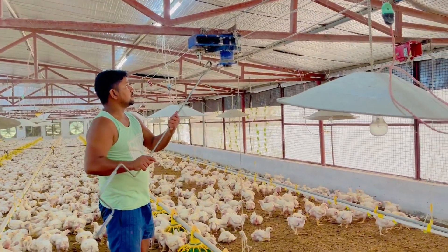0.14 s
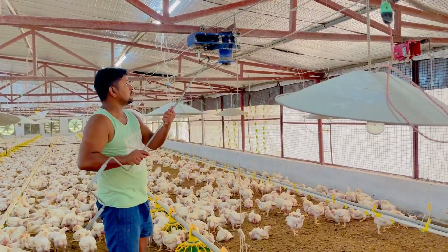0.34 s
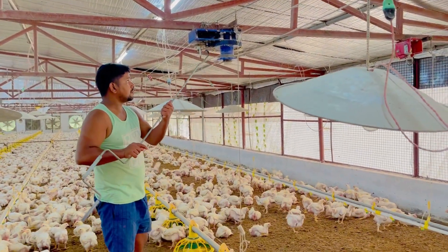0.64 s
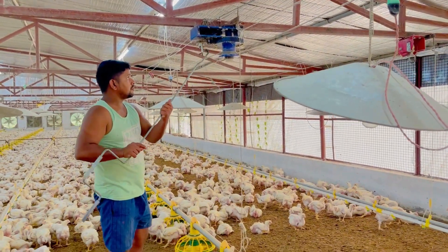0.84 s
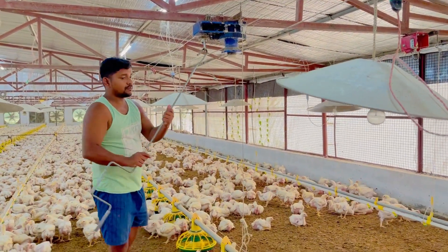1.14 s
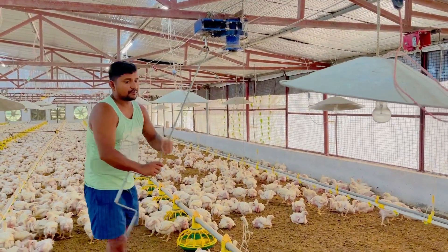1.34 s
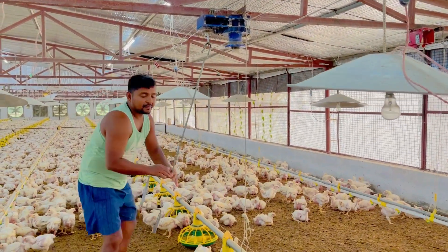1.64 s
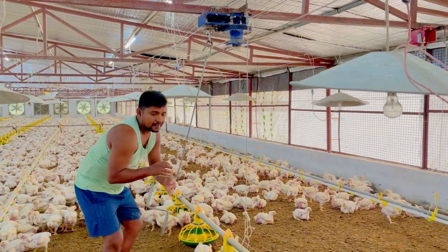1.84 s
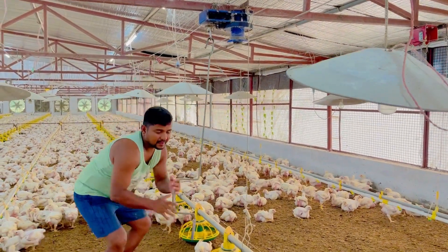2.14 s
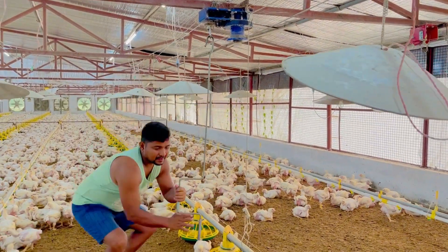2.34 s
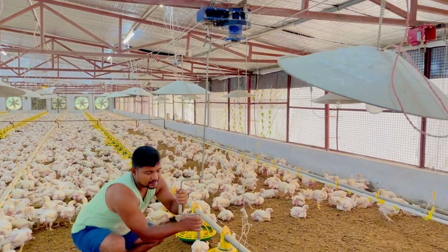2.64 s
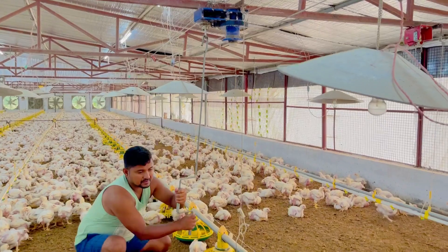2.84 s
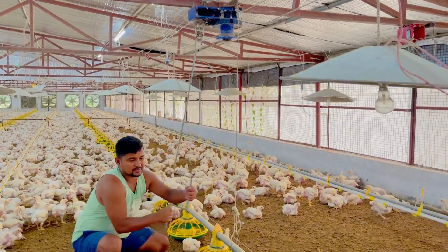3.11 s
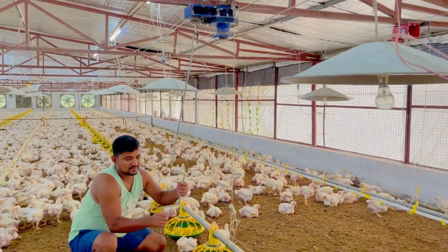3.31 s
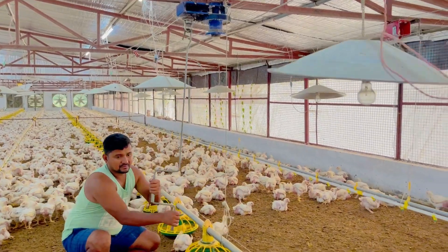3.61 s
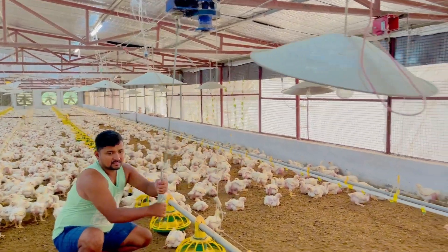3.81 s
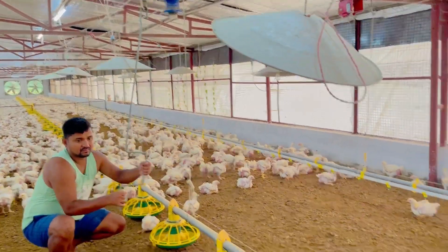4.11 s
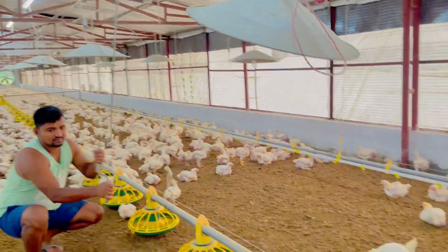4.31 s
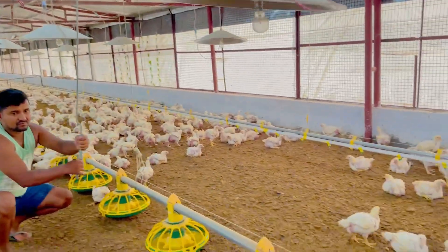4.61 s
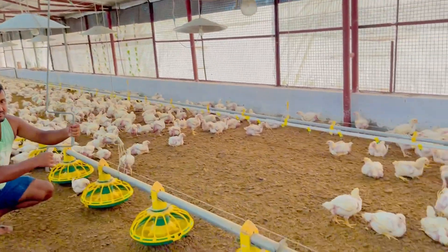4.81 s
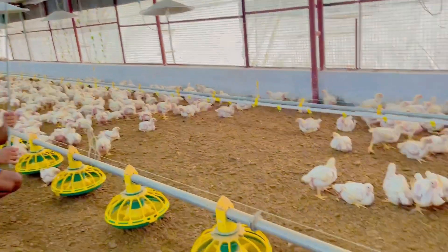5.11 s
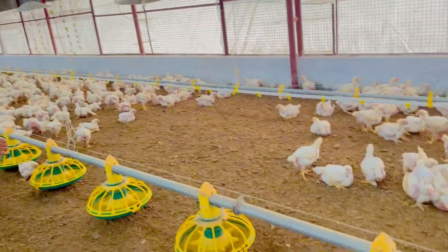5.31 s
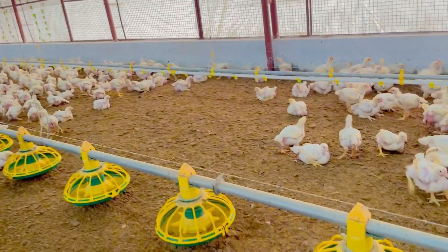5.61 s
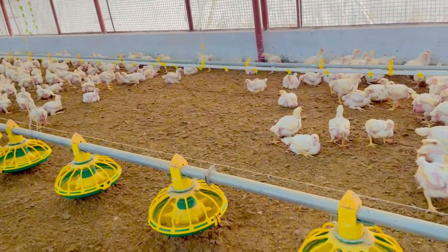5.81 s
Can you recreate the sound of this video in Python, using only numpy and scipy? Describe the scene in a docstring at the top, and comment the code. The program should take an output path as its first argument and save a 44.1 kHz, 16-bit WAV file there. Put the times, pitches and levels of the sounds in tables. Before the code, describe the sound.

In a long, airy poultry shed, fans drone and throb beneath soft bird chatter, with a few nearer peeps standing out. Faint ticks and one clearer metallic tick near one second precede a thin axle squeak at about three. Sharp, bright winch clacks then repeat in a slightly uneven rhythm, with extra gear ticks between them, while the flock grows louder. A single handheld-style mono perspective, winch close, with a light scattered echo.

```python
"""In a long poultry shed a hand winch is turned nearby: it squeaks as it takes the load, then its pawl clacks.
The clacks, gear ticks and frame knocks are struck modes with shaped noise; the squeaks are stick-slip partials.
A flock of young broilers peeps and chatters in gliding tones over shaped noise. Exhaust fans throb as
beating harmonics, with a roar of filtered noise and low gusts. Sparse, decaying echoes throw
the winch and the birds back from the shed."""
import sys
import numpy as np
from scipy import signal
from scipy.fft import rfft, irfft
from scipy.io import wavfile
from scipy.ndimage import uniform_filter1d

SR = 44100
rng = np.random.default_rng(int(sys.argv[2]) if len(sys.argv) > 2 else 0)


def unload_wav(signal):
    """Save mono or channel-first audio to the path in sys.argv[1] as 16-bit WAV at rate SR, clipped to [-1, 1]."""
    wavfile.write(
        sys.argv[1],
        SR,
        np.round(np.clip(np.atleast_2d(signal).T, -1, 1) * 32767).astype(np.int16),
    )


N = 262395

# modes of the winch frame: mode_hz, relative_level_db
FRAME_MODES = [(910, -6.5), (1310, 2.5), (2130, -3.5), (2330, -3), (3200, -1.5), (3570, -3.5), (4330, -5),
               (5135, 2), (5600, -1), (6150, 1), (7200, -4), (7800, -15), (8590, 2), (9680, -1),
               (10750, 2.5)]
# voice spectrum of the flock, also used as the noise colour of frame knocks: frequency_hz, relative_level_db
THROAT_SPECTRUM = [(500, -33.5), (900, -14.5), (1200, -8), (1600, -6.5), (2100, -2), (2600, -9.5),
                   (3300, -15.5), (4200, -30)]


def gain_of(db):
    """Level law: an amplitude ratio is ten to the power of dB over twenty."""
    return 10 ** (np.asarray(db) / 20)


def evened(x):
    """Equal power: scales a signal to rms 1."""
    return x / np.sqrt(np.mean(x ** 2) + 1e-20)


def read(points, hz):
    """Logarithmic frequency scale: interpolates a table of frequency and value."""
    f, value = np.transpose(points)
    return np.interp(np.log(hz + 1), np.log(f + 1), value)


def add(mix, s, sound):
    """Superposition: adds a sound into the mix from time s on."""
    part = mix[round(s * SR):][:len(sound)]
    part += sound[:len(part)]


def wander(count, width):
    """Slow random fluctuation: noise smoothed twice over width samples, at rms 1."""
    once = uniform_filter1d(rng.standard_normal(count), width)
    return evened(uniform_filter1d(once, width))


def dying(x, t60s):
    """Frequency-dependent decay: each band falls by 60 dB in its own t60."""
    hz, t, bands = signal.stft(x, SR, nperseg=128)
    decay_db = -60 * t / read(t60s, hz)[:, None]
    return signal.istft(bands * gain_of(decay_db), SR, nperseg=128)[1][..., :x.shape[-1]]


def coloured(x, points):
    """Linear filtering: multiplies the spectrum by a table of frequency and dB."""
    count = x.shape[-1]
    response = gain_of(read(points, np.fft.rfftfreq(count, 1 / SR)))
    return irfft(rfft(x) * response, count)


def leading(modes, lead_hz, lead_db):
    """Selective excitation: draws modes near lead_hz towards the level lead_db."""
    width = 0.097  # in natural log of frequency
    hz, db = np.transpose(modes)
    near = np.exp(-(np.log(hz / lead_hz) / width) ** 2)
    return np.c_[hz, db + near * (lead_db - db)]


def rings(modes, t, t60):
    """Modal decay of struck metal: clusters of three close tones beat, and high modes die first."""
    hz, db = np.repeat(modes, 3, axis=0).T[:, :, None]
    level, detune, phase = rng.standard_normal((len(hz), 3)).T[:, :, None]
    mode_t60 = t60 * (1000 / hz) ** .4  # t60 holds at 1 kHz
    db = db + 3.2 * level - 60 * t / mode_t60  # uneven excitation, then decay
    tones = np.sin(2 * np.pi * hz * (1 + 0.0113 * detune) * t + 2 * phase)
    return (gain_of(db) * tones).sum(0)


def clacks(ring_db=-2.5, split_hz=2800, bright_hz=9000, chatter_db=2.0):
    """Impact excitation: each pawl drop cracks, rings the frame with one leading mode and rattles its plates."""
    # pawl drops: start_s, level_db, hardness_db, lead_hz
    pawl_drops = [(3.066, -19, 0, 2330), (3.268, -18, -1, 2330), (3.473, -18, 0.5, 2120),
                  (3.703, -18, 4, 3570), (3.896, -19, 1.5, 2130), (4.129, -18, -2.5, 8590),
                  (4.309, -17, 0, 2130), (4.482, -18.5, 4, 10750), (4.670, -18.5, -0.5, 8590),
                  (4.970, -19, -3, 2380), (5.192, -19.5, 0, 8590), (5.406, -18, 3, 10750),
                  (5.615, -19, 0, 7200), (5.882, -18, -1.5, 8590)]
    # dense ring of the plates: frequency_hz, relative_level_db
    plate_spectrum = [(180, -24), (300, -10), (1030, -5.5), (1340, -1), (1660, -5.5), (2140, 1.5),
                      (2700, -3), (3460, -5), (4670, -7.5), (6500, -5.5), (10600, -1), (15000, -13),
                      (17000, -23)]
    # decay of the plates: frequency_hz, t60_s
    plate_t60 = [(400, 0.6), (1500, 0.26), (4000, 0.29), (10000, 0.15), (15000, 0.079)]
    lead_db, frame_t60 = 7.5, .26  # dB; s at 1 kHz
    crack_db, crack_per_db = -2, 0.54  # a harder blow cracks more
    dull_per_db = -0.67  # and loses low ring

    out, t = np.zeros(N), np.arange(12288) / SR
    hz = np.fft.rfftfreq(len(t), 1 / SR)
    for s, db, hard_db, lead_hz in pawl_drops:
        ring = rings(leading(FRAME_MODES, lead_hz, lead_db), t, frame_t60)
        plates = dying(coloured(rng.standard_normal(len(t)), plate_spectrum), plate_t60)
        chatter = gain_of(chatter_db * wander(len(t), 150))  # loose parts chatter on
        plates = plates / plates[:800].std() * chatter
        blow = gain_of(ring_db) * ring / ring[:800].std() + plates
        # hardness tilts the lows below split_hz against the treble above bright_hz
        low_db = (-2 + dull_per_db * hard_db) / (1 + (hz / split_hz) ** 4)
        treble_db = hard_db / (1 + (bright_hz / (hz + 1)) ** 8)
        tilted = irfft(rfft(blow) * gain_of(low_db + treble_db))
        crack = gain_of(crack_db + crack_per_db * hard_db) * np.exp(-t / 0.03)
        onset = 1 - np.exp(-t / 0.001)
        add(out, s - .001, gain_of(db) * tilted * onset * (1 + crack))
    return out


def ticks(lead_db=5):
    """Light contact: a puff of grit noise, small modes with one leading, and a knock of the frame."""
    # small metal ticks of handle and gear: start_s, level_db, lead_hz
    contacts = [(0.159, -41, 8400), (0.272, -43, 4700), (0.9036, -24, 7650), (0.935, -35, 6250),
                (0.9435, -31, 6250), (0.9848, -34, 6250), (0.993, -40, 6250), (1.2273, -40, 4700),
                (1.7574, -45, 4700), (1.911, -38, 6250), (2.0493, -41, 6250), (2.1537, -41, 9700),
                (2.3575, -45, 3800), (2.7621, -50, 9700), (3.174, -19.5, 4700), (3.21, -29, 6250),
                (3.968, -21, 7650), (4.068, -16, 4700), (4.1124, -23, 4700), (4.4129, -36, 8400),
                (4.4458, -29, 3800), (4.8587, -27, 4700), (4.899, -33, 9700), (4.932, -29, 9700),
                (5.3298, -27.5, 5600), (5.7901, -18, 9700), (5.8148, -40, 7650), (5.8373, -22.5, 9700)]
    # modes of the small parts: mode_hz, relative_level_db
    small_modes = [(3800, -10), (4700, -6), (5600, -25), (6250, -12), (7650, -19), (8400, -15),
                   (9700, -4.5)]
    faint_per_s, faint_db = 2.6, -42.5  # chance ticks: rate, lowest level
    knock_db, knock_share = -32, 0.39  # the knock grows more slowly than the tick, in dB per dB
    grit_spectrum = [(2500, -8.5), (4200, 4.5), (10500, 3), (16000, -20)]  # frequency_hz, relative_level_db

    out, t = np.zeros(N), np.arange(4096) / SR
    chances = rng.random((round(faint_per_s * N / SR), 3))
    faint = [(when * N / SR, faint_db + 6 * size, 3500 + 6500 * pitch) for when, size, pitch in chances]
    for s, level_db, hz in contacts + faint:
        grit = evened(coloured(rng.standard_normal(len(t)), grit_spectrum))
        puff = grit * (0.43 * np.exp(-t / 0.0047) + 0.13 * np.exp(-t / 0.04))
        tick = puff + 0.21 * rings(leading(small_modes, hz, lead_db), t, 0.098)
        thud = evened(coloured(rng.standard_normal(len(t)), THROAT_SPECTRUM)) * np.exp(-t / .02)
        knock = rings(FRAME_MODES[:4], t, 0.058) + 0.6 * thud
        both = gain_of(level_db) * tick + gain_of(knock_db + knock_share * level_db) * knock
        onset = 1 - np.exp(-t / 0.0008)
        add(out, s - .001, both * onset)
    return out


def squeaks(unsteady=0.015, scrape_db=-11):
    """Stick-slip friction at the axle: unsteady slips give broken, wavering partials over a scrape."""
    # one track per squeak: time_s, slip_rate_hz, level_db, others_db (level of all partials but the first listed)
    slip_tracks = [
        [(2.75, 2820, -52, -2), (2.78, 2830, -42, -7), (2.81, 2680, -50, -10), (2.85, 2600, -53, -10)],
        [(2.885, 2900, -48, -6), (2.909, 2802, -44, -3), (2.94, 2790, -38.5, 0), (2.975, 2750, -37, -0.5),
         (3.009, 2800, -50, 4), (3.04, 2620, -48, -2)],
        [(2.89, 2950, -40, -12), (2.932, 3076, -40, -18), (2.96, 3050, -43, -14), (2.994, 3100, -42, -17),
         (3.02, 3240, -43.5, 3.5), (3.04, 3360, -45.5, 5.5), (3.065, 3150, -29.5, -5)],
    ]
    # partials of each squeak: multiple, relative_level_db
    slip_partials = [
        [(1, 7.5), (3, 1)],
        [(2, 0), (1.53, -8), (3, 1.5), (4, -5), (5, -15)],
        [(1, 7.5), (2, 7), (3, -7), (4, -12)],
    ]
    scrape_spectrum = [(2500, -23), (5000, -7), (11000, 7), (15000, -13)]  # frequency_hz, relative_level_db

    out = np.zeros(N)
    for rows, partials in zip(slip_tracks, slip_partials):
        s, *columns = np.transpose(rows)
        t = np.arange(s[0], s[-1], 1 / SR)
        hz, db, others_db = (np.interp(t, s, c) for c in columns)
        slip_hz = hz * (1 + unsteady * wander(len(t), 40))
        phase = 2 * np.pi * np.cumsum(slip_hz) / SR
        broken = [gain_of(g + 3.4 * wander(len(t), 120)) * np.sin(k * phase) for k, g in partials]
        scrape = coloured(rng.standard_normal(len(t) + 1), scrape_spectrum)[:len(t)]
        tone = broken[0] + gain_of(others_db) * sum(broken[1:]) + gain_of(scrape_db) * evened(scrape)
        add(out, s[0], tone * gain_of(db) * signal.windows.tukey(len(t), .1))
    return out


def peep(length, start_hz, end_hz, second_db=-22, flutter=.015):
    """Frequency modulation: a short whistled note glides and flutters, with a faint second harmonic."""
    u = np.linspace(0, 1, max(round(length * SR), 64))  # share of the note passed
    shake = np.sin(2 * np.pi * (70 * length * u + rng.random()))
    glide_hz = start_hz + (end_hz - start_hz) * u ** 1.486
    phase = 2 * np.pi * np.cumsum(glide_hz * (1 + flutter * shake)) / SR
    envelope = np.sin(np.pi * u ** 0.64) ** 0.58
    return (np.sin(phase) + gain_of(second_db) * np.sin(2 * phase)) * envelope


def flock(per_s=330, spread_db=3.5):
    """Incoherent summation: hundreds of far peeps a second blur into chatter; the nearest stand out."""
    # nearest birds: start_s, length_s, start_hz, end_hz, level_db (relative, as all are doubled in amplitude)
    near_peeps = [(0.13, 0.033, 1200, 1200, -50), (.21, 0.044, 1500, 1410, -46),
                  (0.364, 0.049, 2126, 2050, -43.5), (.43, .06, 2150, 2000, -47),
                  (0.533, 0.02, 1130, 1140, -44), (0.548, 0.035, 1540, 1500, -42),
                  (.55, 0.042, 2200, 1940, -45), (.70, .04, 1590, 1510, -45),
                  (0.911, 0.029, 934, 820, -41.5), (0.917, 0.029, 1740, 1620, -38.5),
                  (0.993, 0.042, 2700, 2710, -48), (1.011, 0.037, 1807, 1340, -39.5),
                  (1.075, 0.023, 1788, 1670, -34.5), (1.208, 0.024, 1256, 1210, -44),
                  (1.372, 0.059, 1886, 1800, -44), (1.435, 0.073, 1210, 1260, -50.5),
                  (1.639, 0.035, 1393, 1300, -43), (1.717, 0.027, 2120, 2190, -45),
                  (1.752, 0.099, 1986, 1870, -48), (1.812, 0.044, 2290, 2260, -45.5),
                  (1.837, 0.054, 1188, 1135, -44.5), (1.859, 0.04, 2146, 1930, -42),
                  (2.325, 0.065, 1097, 1100, -47), (2.407, 0.034, 1885, 2010, -42),
                  (2.464, 0.074, 2940, 2870, -51), (2.486, 0.05, 1484, 1440, -39.5),
                  (2.507, 0.024, 1750, 1640, -43), (2.645, 0.044, 2130, 2160, -46),
                  (2.645, 0.038, 1534, 1420, -44), (2.696, 0.028, 1090, 1070, -43.5),
                  (2.743, 0.043, 2745, 2806, -44), (2.795, 0.019, 1360, 1160, -40.5),
                  (3.004, 0.032, 2055, 1840, -36), (3.01, 0.048, 3900, 3940, -50),
                  (3.023, 0.03, 2490, 2510, -39), (3.159, 0.044, 2290, 2460, -35),
                  (3.2, 0.057, 1582, 1595, -31), (3.849, 0.051, 2800, 2834, -42.5),
                  (3.852, 0.056, 1500, 1440, -45), (3.983, 0.039, 1757, 1790, -36),
                  (3.996, 0.051, 2950, 2890, -39.5), (4.02, 0.032, 1865, 1726, -41),
                  (4.199, 0.048, 1410, 1310, -38), (4.747, 0.056, 1382, 1320, -39),
                  (5.106, 0.03, 1840, 1750, -41), (5.263, 0.039, 1956, 1920, -36),
                  (5.281, 0.049, 3230, 3260, -47), (5.672, 0.071, 2910, 2830, -41),
                  (5.729, 0.052, 2870, 2560, -43), (5.77, 0.018, 1700, 1580, -28.5),
                  (5.827, 0.035, 1883, 1730, -36.5)]
    # chatter, which grows when the winch starts: time_s, level_db (before chance flurries)
    chatter_track = [(0, -40.5), (.14, -43.5), (.22, -38.5), (.45, -46), (.58, -39.5), (.87, -43.5),
                     (.93, -35), (1.08, -43), (1.17, -45), (1.36, -68), (1.42, -43), (2.4, -41.5),
                     (3.05, -38.5), (3.2, -33.5), (3.52, -42), (4.35, -34.5), (5.26, -32.5), (5.95, -33.5)]
    flurry_db = 2.5  # rms of the chance flurries

    far, near = np.zeros(N), np.zeros(N)
    for when, pitch, glide, long, size in rng.random((round(per_s * N / SR), 5)):
        hz = 600 * 6.5 ** pitch
        db = read(THROAT_SPECTRUM, hz) - spread_db * np.log(1 - .97 * size)  # a few are much louder
        note = peep(0.0094 + 0.052 * long ** 2, hz, hz * (1.02 - 0.1945 * glide))
        add(far, when * N / SR, gain_of(db) * note)
    for s, length, start_hz, end_hz, db in near_peeps:
        add(near, s, 2 * gain_of(db) * peep(length, start_hz, end_hz))
    blur = coloured(rng.standard_normal(N + 1), THROAT_SPECTRUM)[:N]  # the farthest birds are one hiss
    far = evened(far) + gain_of(-4.5) * evened(shed(far)) + gain_of(-3.5) * evened(blur)
    s, db = np.transpose(chatter_track)
    chatter_db = np.interp(np.arange(N) / SR, s, db) + flurry_db * wander(N, 900)
    return evened(far) * gain_of(chatter_db) + near + gain_of(-5.5) * shed(near)


def hum(waver_db=.8):
    """Beating: fans hum on multiples of nearby blade rates, and the sum swells where they run in step."""
    # exhaust fans: blade_rate_hz, in_step_s (moment in step with the first fan)
    fans = [(39.079, 0), (39.196, 3.128), (39.253, 4.713), (39.912, 3.382), (33.28, 2.72), (32.82, 2.72)]
    # one row per fan: level_db of multiples 1, 2, 3, .. (rms, before the slow waver)
    fan_levels = [(-36.5, -36, -46.5, -61, -66.5, -55), (-36, -37.5, -50.5, -50.5, -47.5, -53),
                  (-47, -36.5, -61, -53, -49, -65, -52), (-33.5, -48.5, -53, -59.5, -56.5, -55), (-51,),
                  (-43.5,)]

    t, out = np.arange(N) / SR, np.zeros(N)
    lag = rng.random(8)  # one per multiple, shared by all fans
    first_hz = fans[0][0]
    for (hz, step_s), levels in zip(fans, fan_levels):
        turns = first_hz * t + (hz - first_hz) * (t - step_s)
        tones = sum(gain_of(db) * np.sin(2 * np.pi * ((k + 1) * turns + lag[k]))
                    for k, db in enumerate(levels))
        out += np.sqrt(2) * tones * gain_of(waver_db * wander(N, 9000))
    return out


def air():
    """Broadband flow noise: fan roar and hiss drift in patches of time and frequency, with low gusts."""
    # colour of roar and hiss: frequency_hz, relative_level_db
    roar_spectrum = [(15, -9.5), (28, -7), (60, -10.5), (120, -11), (250, -23.5), (500, -32.5),
                     (900, -38.5), (2000, -29.5), (4000, -51.5), (6500, -50.5), (9500, -46), (12000, -52),
                     (16000, -73)]
    # air moving over the microphone: time_s, level_db
    gust_track = [(0.0, -32), (1.42, -30), (1.54, -24), (1.64, -39), (2.2, -26), (2.33, -37), (2.95, -36),
                  (3.43, -33), (3.46, -31), (3.88, -36), (4.87, -28), (4.97, -34.5), (5.95, -52)]
    roar_db = -32.5

    frames, hz = N // 256 + 5, np.fft.rfftfreq(1024, 1 / SR)
    real, imaginary, patches = rng.standard_normal((frames, 513, 3)).T
    patches = uniform_filter1d(patches, 14, axis=0)  # across frequency
    patches = evened(uniform_filter1d(patches, 10, axis=1))  # across time
    flicker = wander(frames, 3) * (hz[:, None] > 3000)  # feet and litter rustle in the treble
    bands = (real + 1j * imaginary) * gain_of(1.3 * patches + 1.8 * flicker)
    noise = signal.istft(bands, nperseg=1024, noverlap=768)[1][:N + 1]
    roar = coloured(noise, roar_spectrum)[:N]
    s, db = np.transpose(gust_track)
    low_band = signal.butter(2, [14, 33], "band", fs=SR, output="sos")
    low = signal.sosfilt(low_band, rng.standard_normal(N))
    gusts = evened(low) * gain_of(np.interp(np.arange(N) / SR, s, db))
    return gain_of(roar_db) * evened(roar) + gusts


def shed(x):
    """Reverberation by convolution: sparse echoes of random sign, each band dying at its own speed."""
    # decay of the shed: frequency_hz, t60_s
    shed_decay = [(300, 1), (1000, 0.19), (3000, 0.31), (8000, 0.37), (15000, 0.3)]
    taps = np.zeros(SR)
    at = np.arange(500, SR - 20, 20)  # one echo in every 20 samples
    taps[at + rng.integers(0, 20, len(at))] = rng.choice([-1., 1.], len(at))
    tail = dying(taps, shed_decay)
    return signal.fftconvolve(x, tail / np.linalg.norm(tail))[:N]


def scene():
    """Superposition: the winch and its echoes over flock, fans and air."""
    winch = clacks() + ticks() + squeaks()
    return (winch + gain_of(-10.5) * shed(winch) + flock() + hum() + air())[None]


def record(dry):
    """Linear filtering: the microphone colours the treble, then a low-pass limits the band."""
    # microphone response, which dips near 12 kHz, recovers towards 15 kHz, then falls steeply: frequency_hz, gain_db
    treble_response = [(10000, 0), (11100, -2), (11900, -10.5), (14900, 3), (15600, -29)]
    edge_hz = 16400
    heard = coloured(np.pad(dry, ((0, 0), (0, 1025))), treble_response)[:, :N]
    low_pass = signal.firwin(511, edge_hz, window=("kaiser", 9), fs=SR)
    return signal.oaconvolve(heard, low_pass[None], "same", axes=1)


dry = scene()
out = record(dry)
unload_wav(out)
```